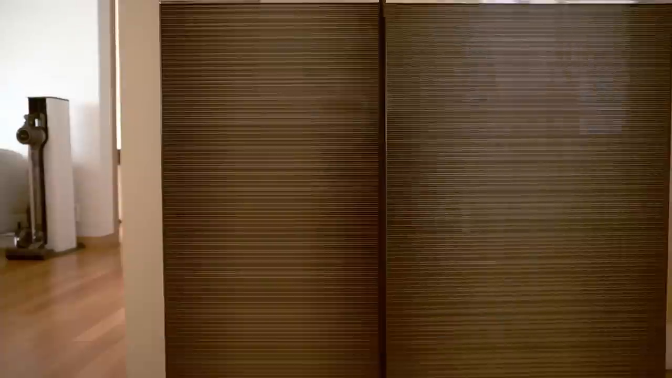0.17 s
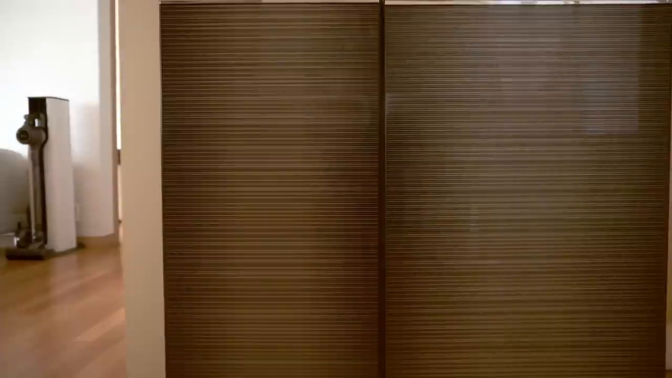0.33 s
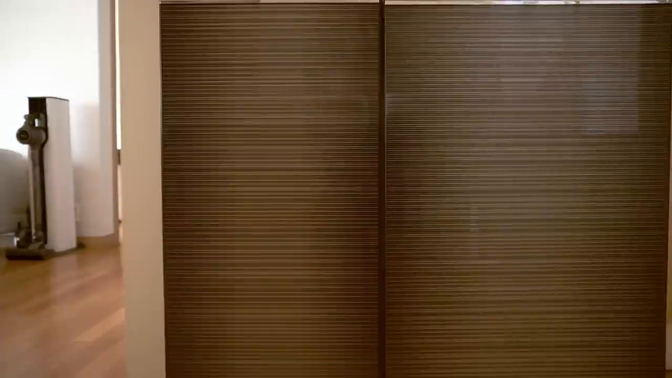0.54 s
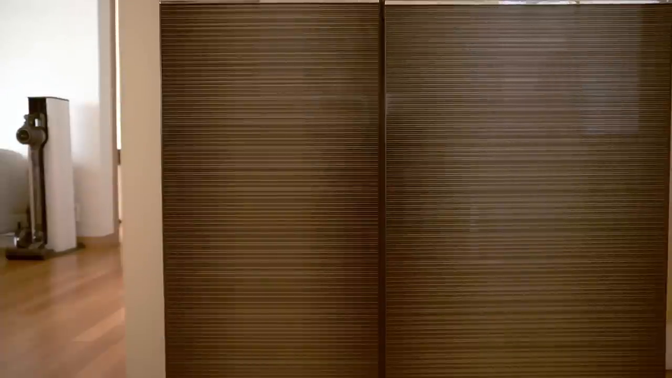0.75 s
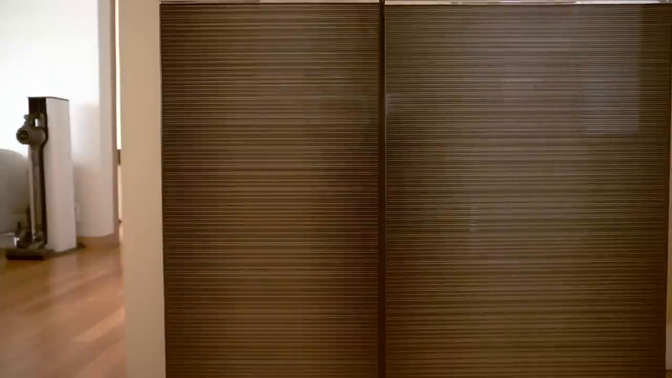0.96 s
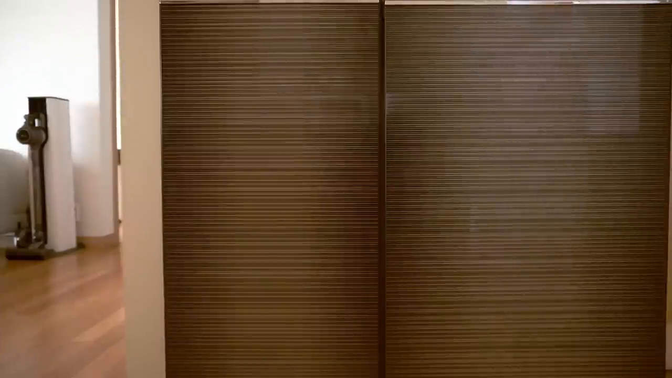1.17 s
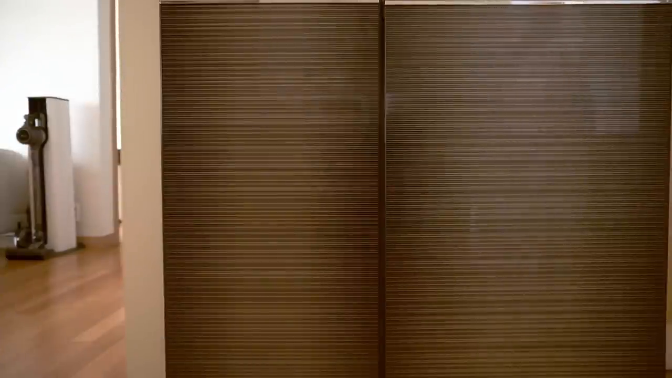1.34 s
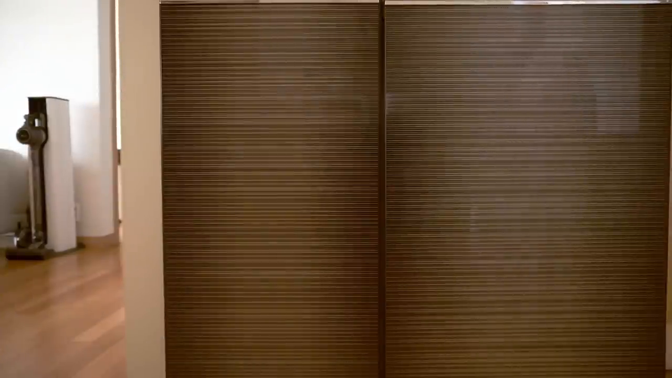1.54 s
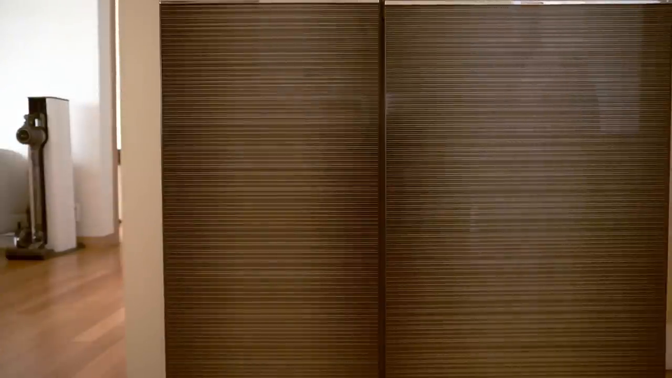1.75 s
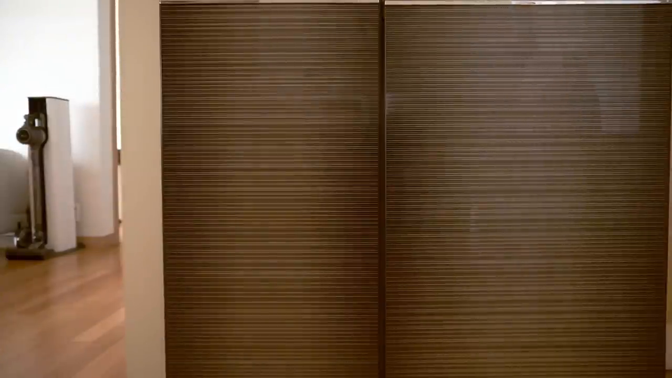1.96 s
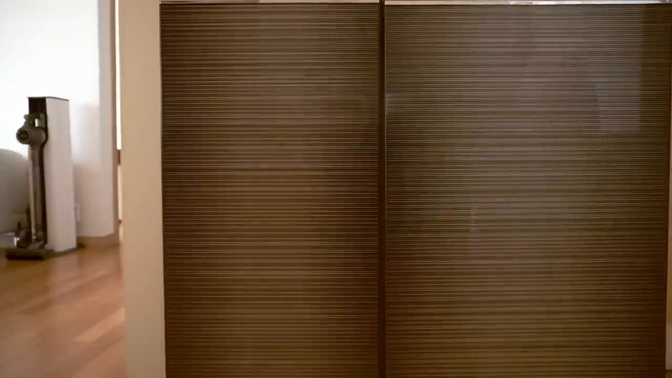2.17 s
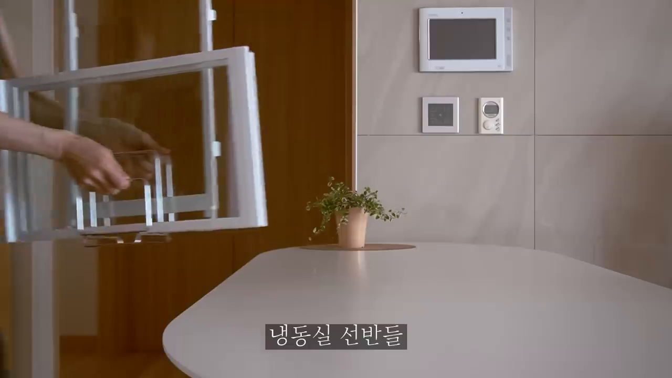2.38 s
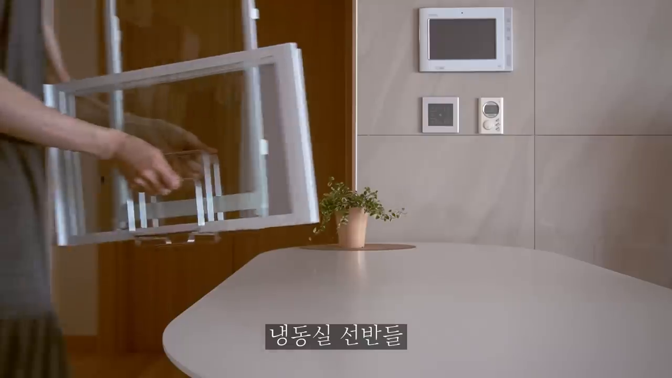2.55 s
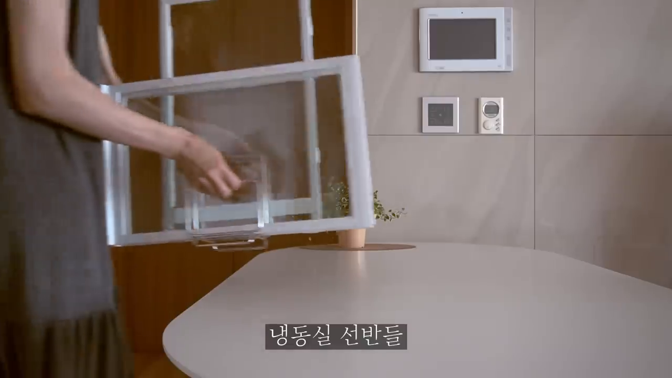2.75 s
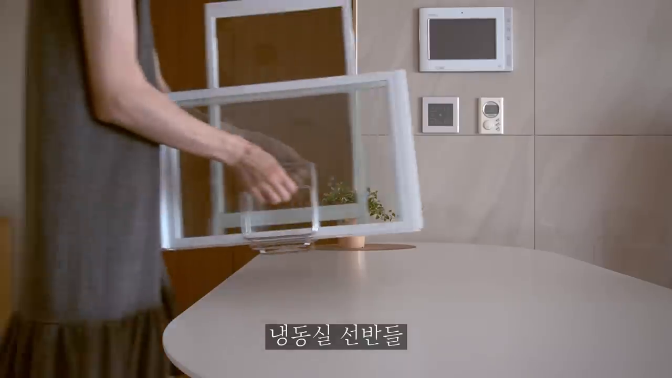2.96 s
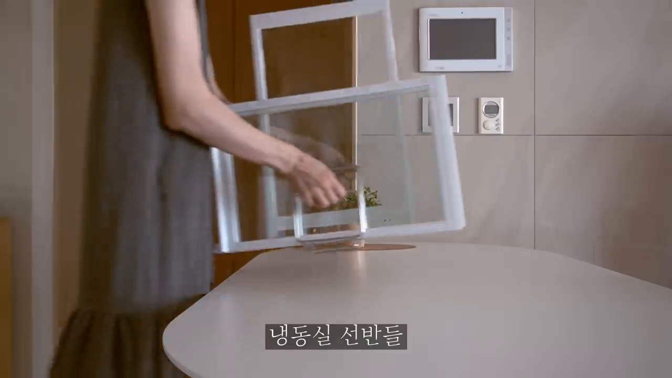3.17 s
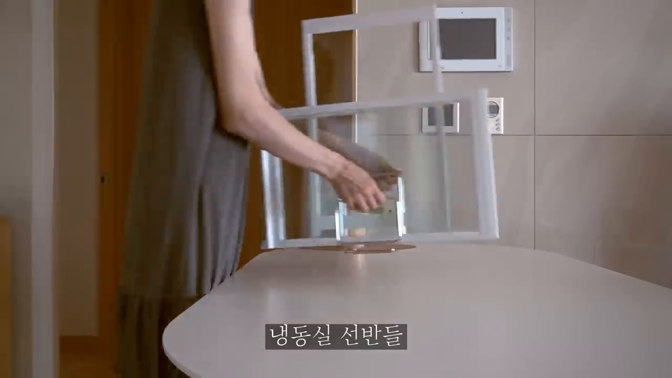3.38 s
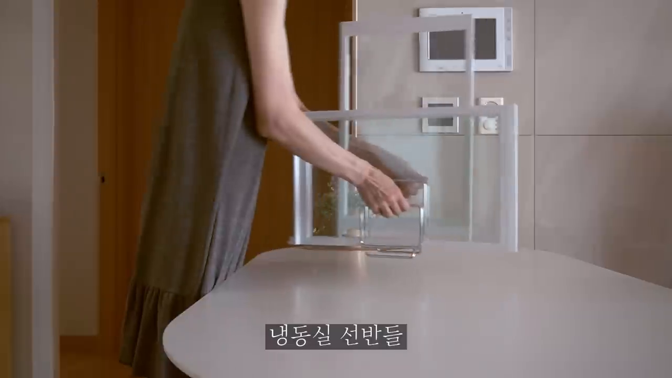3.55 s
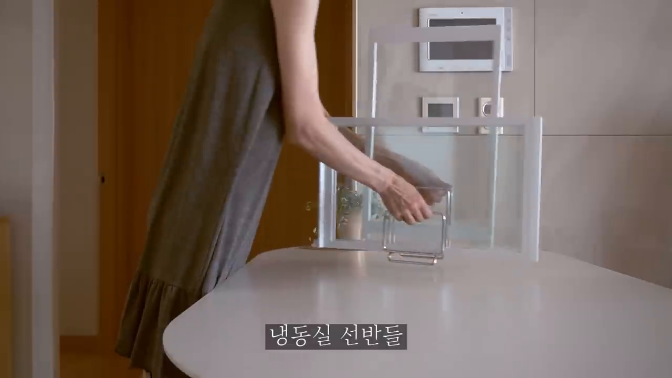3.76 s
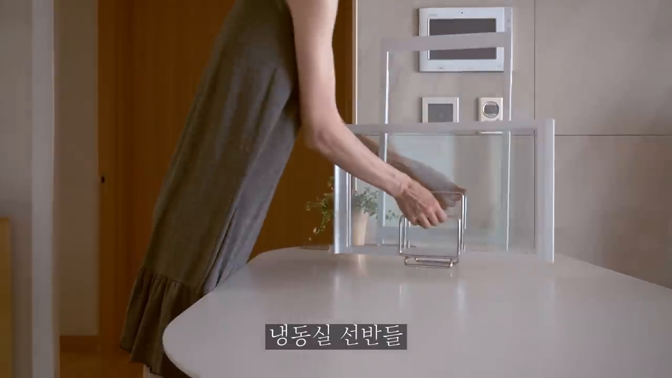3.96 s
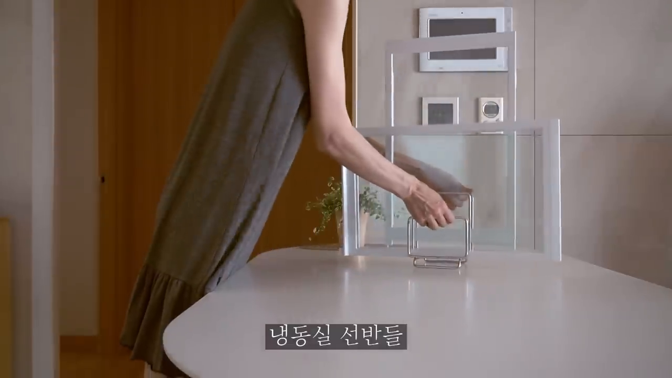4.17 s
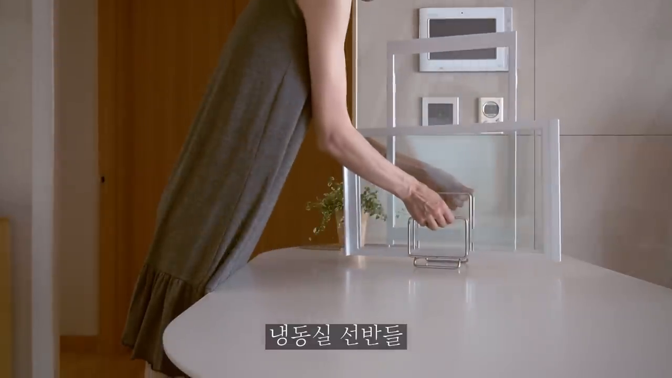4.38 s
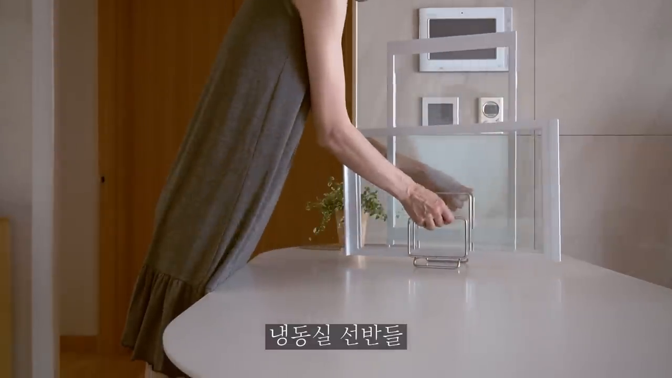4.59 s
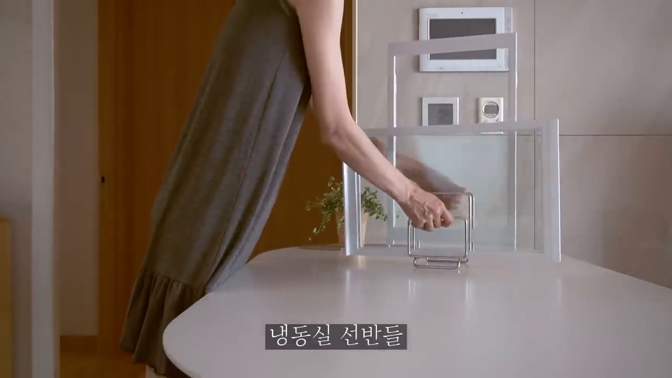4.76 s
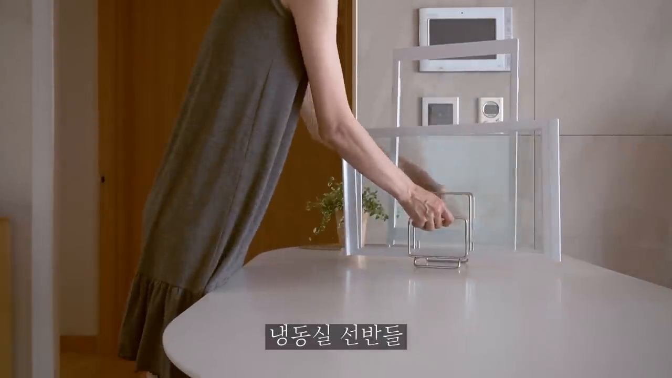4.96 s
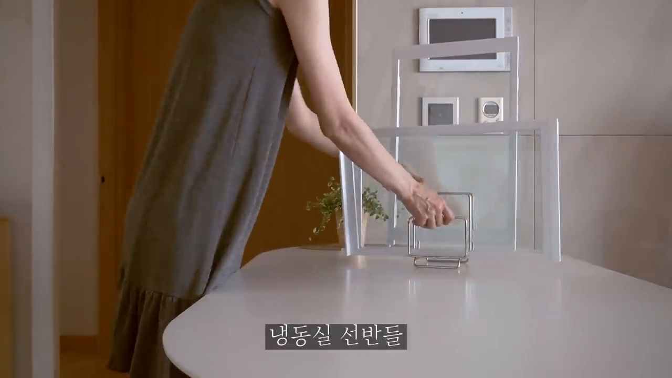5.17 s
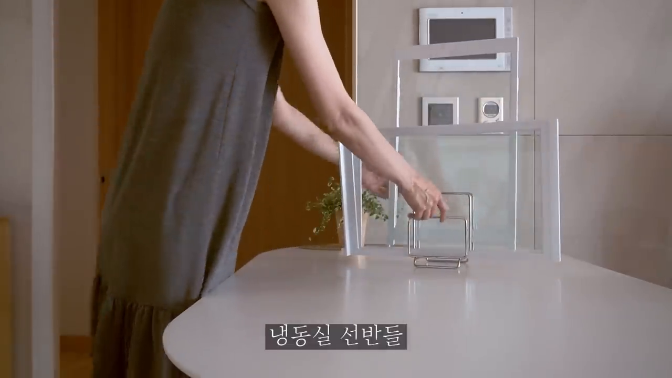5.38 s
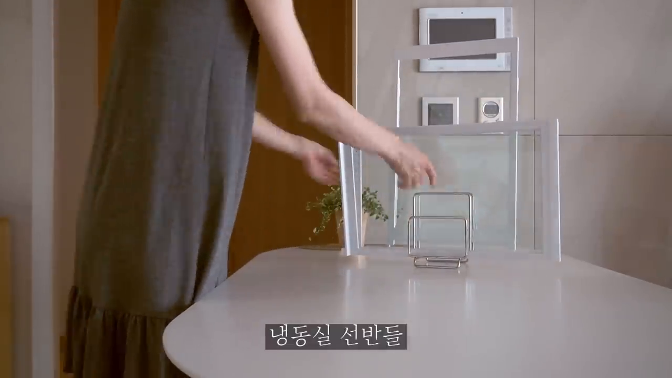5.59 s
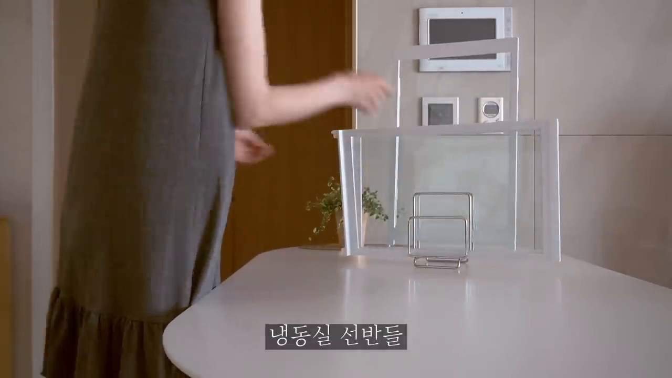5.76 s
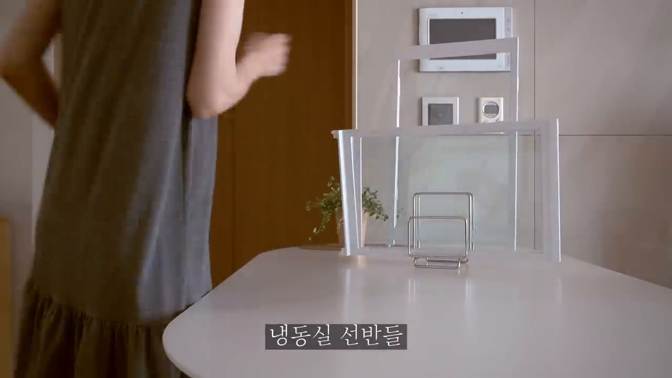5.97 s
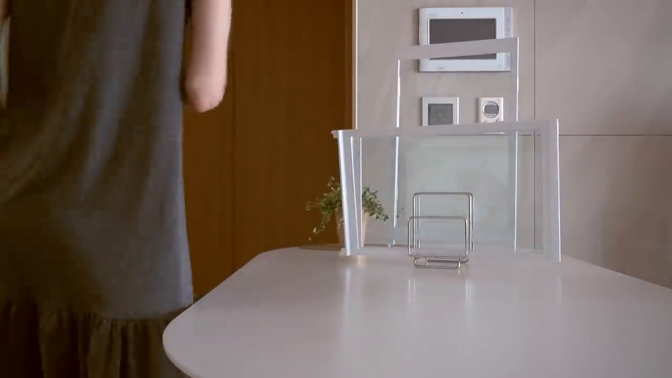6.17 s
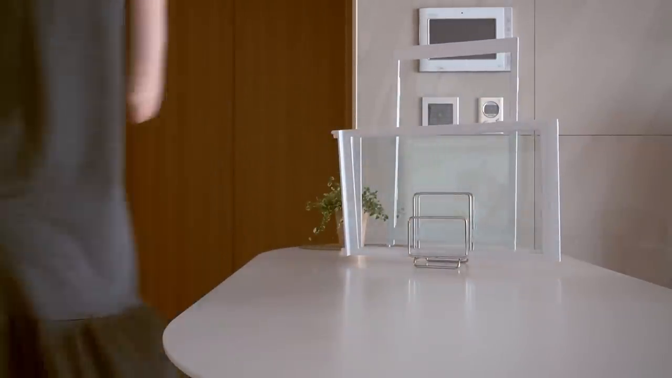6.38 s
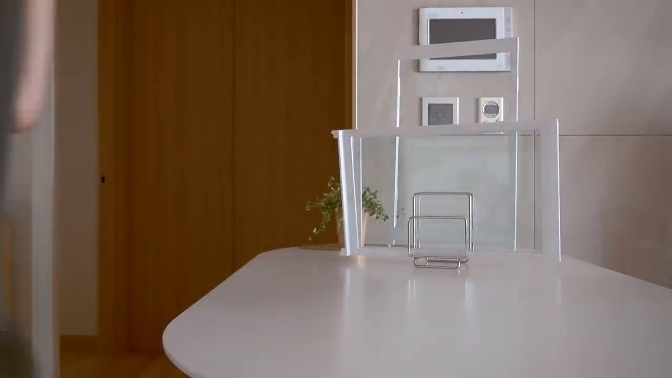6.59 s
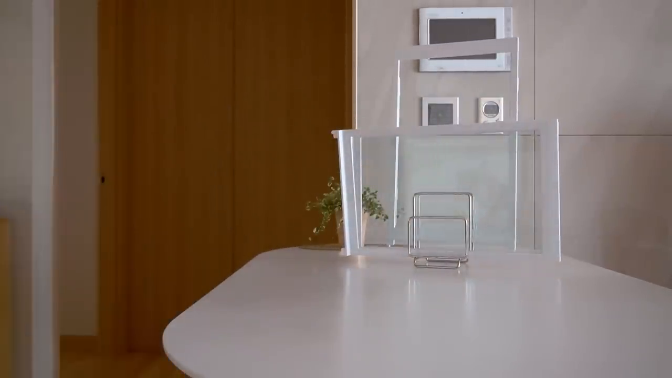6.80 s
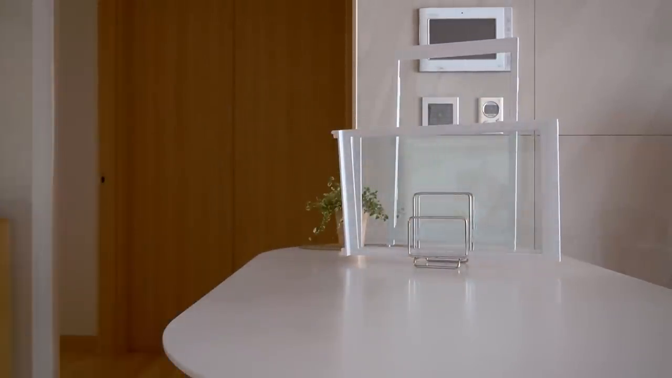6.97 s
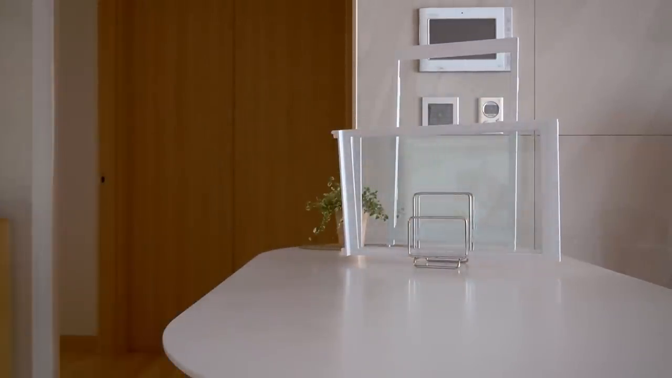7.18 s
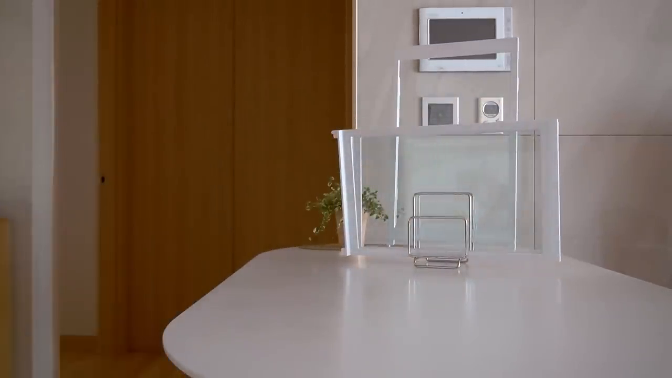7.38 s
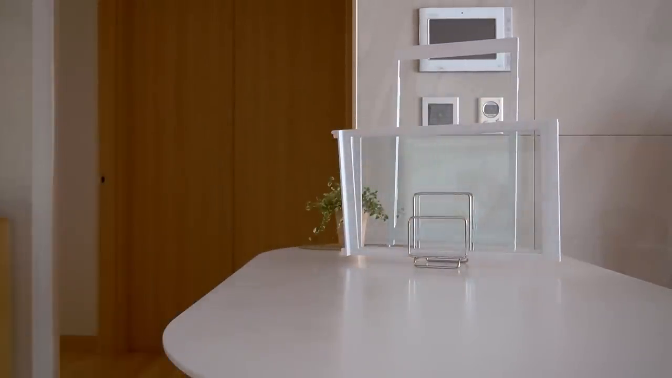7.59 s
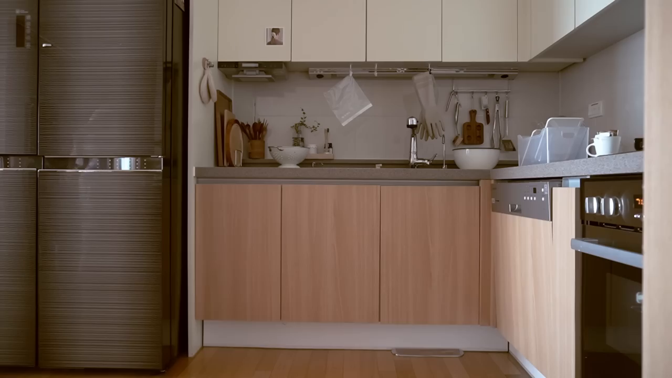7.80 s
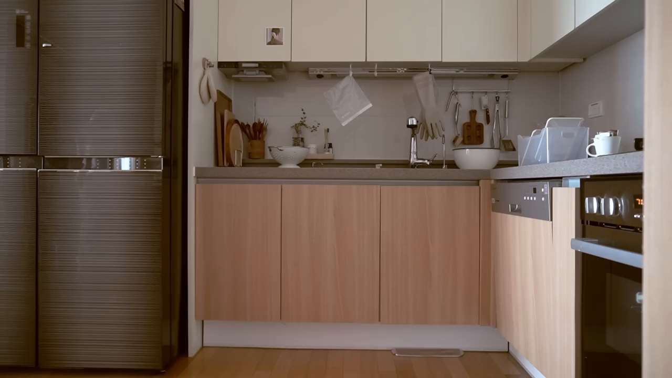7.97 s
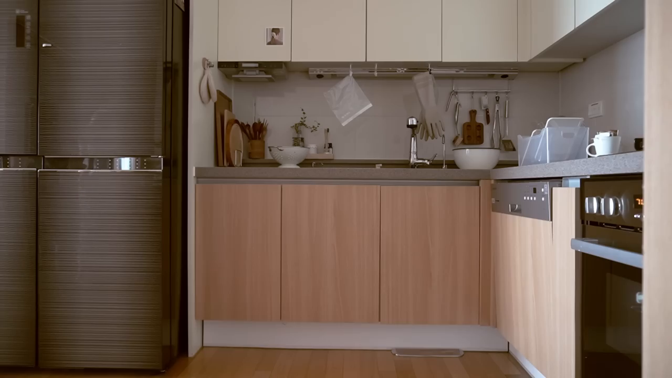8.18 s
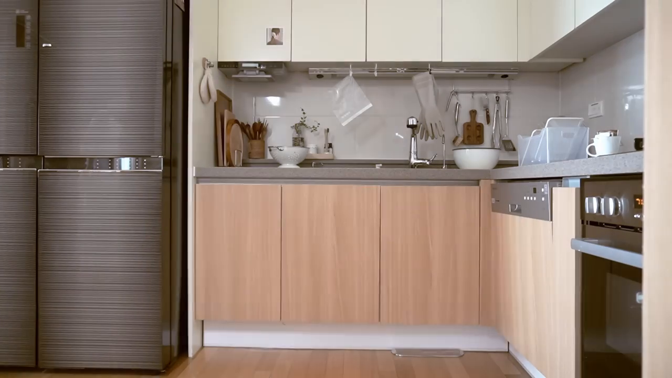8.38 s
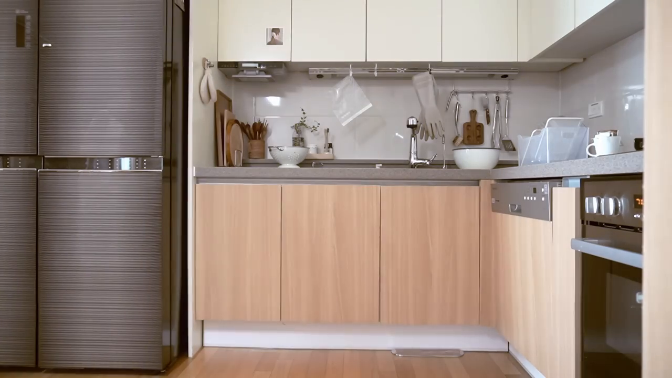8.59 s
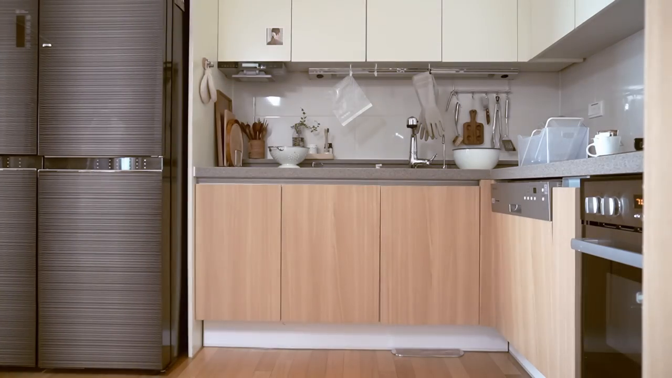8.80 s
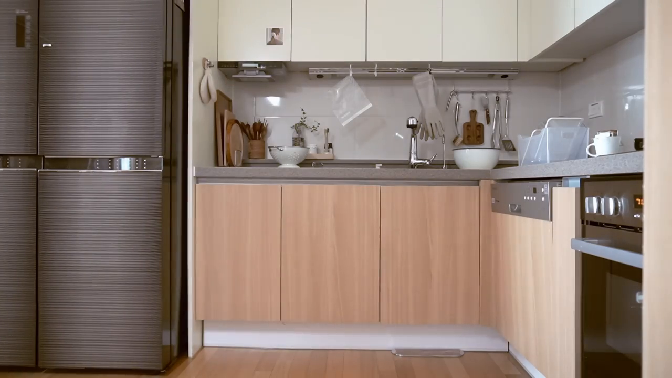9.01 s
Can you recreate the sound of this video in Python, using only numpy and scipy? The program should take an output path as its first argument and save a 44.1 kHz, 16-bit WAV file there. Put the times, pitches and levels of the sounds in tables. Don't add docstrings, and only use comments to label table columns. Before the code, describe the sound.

A refrigerator door slams with a heavy thump, then light plastic shelves rattle onto a table and clatter, and a kitchen latch clacks over faint hum.

```python
import sys
import numpy as np
from scipy import signal
from scipy.io import wavfile
from scipy.ndimage import uniform_filter1d

SR = 44100
rng = np.random.default_rng(int(sys.argv[2]) if len(sys.argv) > 2 else 0)


def how_loud(loudness_db):
    steps = np.asarray(loudness_db, float) / 20
    return 10 ** steps


def unload_wav(signal):
    wavfile.write(
        sys.argv[1],
        SR,
        np.round(np.clip(np.atleast_2d(signal).T, -1, 1) * 32767).astype(np.int16),
    )


N = 398663

PLACE_STARTS_S = [
    0,
    2.33,
    7.795,
    9.1,
]
# frequency in Hz, level in dB per Hz.
AIR_COLOURS = [
    [(12, -43), (20, -9.5), (65, -2.5), (86, -31), (113, -9), (172, -53), (222, -8), (285, -22), (337, -13),
     (446, -21.5), (542, -10), (642, -27), (897, -23.5), (4060, -40.5), (16000, -56.5)],
    [(12, -58), (20, -25.5), (49, -2.5), (70, -9), (91, -25.5), (172, -12), (198, -22), (234, -9.5),
     (293, -16.5), (347, -18), (513, -13), (574, -12), (698, -23), (3840, -41.5), (16000, -52.5)],
    [(12, -23), (20, 0), (49, -10.5), (86, -11.5), (116, -35), (158, -13.5), (367, -14), (410, -27),
     (472, -12.5), (590, -21.5), (642, -20), (1000, -21.5), (5500, -46.5), (16000, -55.5)],
]
AIR_LEVELS_DB = [
    -42.5,
    -46,
    -42,
]
# frequency in Hz, width in Hz, level in dB.
AIR_LINES = [
    [(565, 86, -51.5), (4000, 1000, -67)],
    [(579.3, 30.5, -53.5), (661, 11, -63.5), (4030, 25, -82), (3740, 730, -75.5)],
    [(58.9, 14, -52.5), (2800, 34, -77), (3970, 380, -73)],
]
# frequency in Hz, level in dB, slow swell in dB.
HUMS = [
    (57.4, -46, -2),
    (60.2, -47.5, 1.2),
    (58, -56.5, 6.5),
]
# multiple of the hum, level in dB.
HUM_ORDERS = [
    (1, -1.5),
    (2, -15.5),
    (3, -19),
]
# frequency in Hz, t60 in seconds.
ROOM_T60 = [(60, 0.45), (250, 0.54), (1000, 0.57), (4000, 0.56), (8000, 0.53), (11000, 0.41), (15000, 0.34)]

# start in seconds, level in dB, fade in dB per second.
THUDS = [
    (0.301, -30, 42),
    (0.961, -45, 150),
    (1.089, -54, 100),
    (7.109, -36.5, 90),
    (7.28, -37.5, 115.5),
]
# start in seconds, peak in dB, rise in seconds, centre in Hz, gritty share 0-1.
SCUFFS = [(2.963, -51.5, 0.04, 8500, 0.13), (3.195, -66, 0.0065, 4000, .1),
          (3.539, -59, 0.0055, 3210, 0.55), (3.586, -57.5, .006, 3340, 0.76), (5.66, -63, .01, 3800, 0.1),
          (6.48, -61, 0.029, 4600, 0.4), (6.54, -55.5, .035, 4000, 0.75), (7.19, -67, 0.024, 8000, 0.1)]
# start in seconds, level in dB.
CATCHES = [
    (7.95, -41.5),
    (8.065, -47.5),
    (8.261, -59),
]
# start in seconds, peak in dB, note in Hz, t60 in seconds.
SLIPS = [(7.972, -47, 996, 0.055), (7.985, -38.5, 1037, 0.051), (7.995, -43, 680, 0.057),
         (8.007, -39, 1270, 0.034), (8.02, -39, 1310, .03), (8.034, -37, 1340, 0.06),
         (8.042, -32.5, 1195, 0.044), (8.051, -36, 1030, .03), (8.066, -39, 1200, 0.046),
         (8.094, -42, 1306, 0.054)]

# start in seconds, peak in dB, chatter in ms.
LATCH = [(8.3231, -15.5, 6.7), (8.3269, -13, 4), (8.337, -10.5, 7.6), (8.343, -20, 3.4), (8.354, -14, 8.1),
         (8.368, -23, 4.8), (8.386, -24, 8)]
# frequency in Hz, level in dB per Hz.
LATCH_CRACK = [(120, -56), (200, -30), (223, -41), (387, -16), (440, -17), (538, -6.5), (1230, -12.5),
               (1680, -0.5), (2170, -12.5), (3900, -10), (4400, -17.5), (5100, -18), (6000, -15),
               (6900, -16.5), (7800, -14), (8900, -20), (9500, -22), (10400, -29), (11400, -31.5),
               (12400, -33), (13400, -29), (14200, -35), (14900, -32), (16000, -40)]
# frequency in Hz, level in dB, t60 in seconds.
LATCH_RINGS = [(1720, -26, .12), (1750, -17, 0.17), (1950, -2, 0.035), (3300, -27, .12), (4070, -10, .05),
               (6100, -13.5, 0.11), (7860, -8, 0.04), (9600, -13, 0.06)]

# start in seconds, peak in dB, low-end weight in dB, brightness in dB.
RATTLE = [(2.351, -42, 4, -34), (2.377, -34, 13, -12), (2.411, -39, 1, -33.5), (2.435, -36.5, -2, -31),
          (2.46, -37, -18, -26), (2.518, -44, -19, -1), (2.611, -35.5, -26, -30), (2.6152, -35, -22, -24),
          (2.705, -36, -19, -34), (2.7185, -30, -12, -30), (2.7232, -33, -6, -40), (2.758, -37, -6, -6),
          (2.7915, -30, -10, -34), (2.829, -40, -16, -24), (2.836, -43, -17, -15), (2.87, -41.5, -14, -22),
          (2.876, -42, -22, -10), (3.184, -44, 8, -17), (3.206, -40, -10, -7), (3.543, -39, 1, -24),
          (3.593, -48, -18, -21), (3.854, -43, 3, -36), (3.927, -39.5, -30, -27), (4.6205, -35, 2, -30),
          (4.648, -37, 2, -28), (4.707, -36, -6, -41), (4.73, -35, -10, -35), (4.754, -44, -11, -25),
          (5.454, -33, -5, -16)]
# start in seconds, peak in dB, low-end weight in dB, brightness in dB.
LEAVING = [(6.513, -52, -25, -6), (6.495, -50, -22, -12), (6.543, -50, -26, -14), (6.572, -42, -29, -8),
           (6.588, -54, -17, -16), (6.627, -52, -25, -12), (7.058, -37.5, -4, -21), (7.312, -51, -10, -24),
           (7.133, -41, -5, -26)]
# frequency in Hz, level in dB per Hz.
TICK_CRACK = [(410, -19.5), (700, -1), (1170, 0.5), (1480, -6.5), (1620, -2.5), (4000, -15.5),
              (4700, -23.5), (7870, -31), (14000, -43)]
# frequency in Hz, level in dB, t60 in seconds.
TICK_RINGS = [(1140, -11, .03), (1430, -23, 0.037), (2260, -19, 0.014)]

# start in seconds, peak in dB, weight in dB, brightness in dB, chatter in ms.
SET_DOWN = [
    (4.0157, -5.5, -38, -42, 1.3),
    (4.073, -33, -10, -20, 4.6),
    (4.1445, -16, -35, -39, 2.2),
    (4.1535, -17, -38, -44, 3.5),
    (4.165, -30, -29, -14, 2.4),
]
# start in seconds, peak in dB, weight in dB, brightness in dB, chatter in ms.
SETTLE = [
    (4.2365, -23, -19, -35, 1.2),
    (4.249, -8, -30, -38, 1.3),
    (4.254, -17, -25, -20, 4),
    (4.3245, -18, -30, -40, 2.0),
]
# frequency in Hz, level in dB per Hz.
SET_CRACK = [(53, -57), (90, -6), (165, -3.5), (510, -9.5), (769, 2), (956, -8), (1070, 4), (2300, -7),
             (2530, -15), (3010, -12), (3430, -22.5), (3830, -15.5), (5000, -31), (16000, -56.5)]
# frequency in Hz, level in dB, t60 in seconds.
SET_RINGS = [(178, -2, 0.12), (730, 1, 0.088), (1050, 6.5, 0.064), (1270, -10, 0.091), (1490, 0, 0.066),
             (2160, -5, 0.06), (2643, -9, 0.08), (2940, -17, 0.08), (3644, -13, 0.2), (4360, -24, 0.1),
             (5740, -28, 0.27)]
# frequency in Hz, level in dB, t60 in seconds.
SETTLE_RINGS = [(790, -6, 0.05), (1060, 5, 0.065), (1200, -12, 0.064), (1340, 3, 0.05), (1950, -13, 0.044),
                (2400, -12, 0.08), (2910, -9, 0.07), (3774, -10.5, 0.22), (3896, -10, 0.24),
                (4040, -20, 0.08), (5630, -28, 0.25)]
# start in seconds, peak in dB, weight in dB, brightness in dB, chatter in ms.
CLATTER = [(4.9435, -11.5, -11, -1, 3.8), (4.9485, -11, -26, -3.5, 2.3), (4.957, -16, -15, -12, 3.4),
           (4.9645, -8.5, -9, -10, 4.4), (4.973, -14, -14, -12, 4), (4.9857, -7, -14, -18, 1.8),
           (4.991, -10, -22, -15, 2.7), (5.0035, -10.5, -11, -11, 1.9), (5.008, -8, -22, -4, 3),
           (5.019, -13, -25, -18, 2.7), (5.034, -21.5, -34, -5, 3), (5.049, -16, -21, -2, 6),
           (5.064, -21, -21, -9, 5), (5.184, -9.5, -24, 1, 2.0), (5.192, -11, -19, -19, 2),
           (5.198, -14, -19, -9, 3.3), (5.2456, -14.5, -13, -19, 2.5), (5.2505, -15, -30, -5, 2.4),
           (5.265, -19.5, -16.5, -8, 5), (5.281, -23, -20, -12, 4), (5.301, -25, -15, -16, 5)]
# frequency in Hz, level in dB per Hz.
CLATTER_CRACK = [(53, -36), (90, -22), (112, 1.5), (180, -2.5), (330, -28), (521, 7.5), (593, 1), (753, 5),
                 (956, -2), (1440, 0.5), (2760, -4.5), (3830, -1.5), (4750, -12), (6400, -16), (9110, -20),
                 (13000, -34), (16000, -42)]
# frequency in Hz, level in dB, t60 in seconds.
CLATTER_RINGS = [(172, -27, 0.11), (526, -1.5, 0.063), (713, -7, 0.032), (1420, -30.5, .06),
                 (1670, -8, 0.13), (2050, -12, 0.079), (2510, -37, 0.058), (3120, -20.5, .08),
                 (3400, -39, 0.086), (3930, -5.5, 0.032), (6540, -22, 0.091), (8040, -31, .1)]
# start in seconds, peak in dB, note in Hz, t60 in seconds.
CLACKS = [(4.0162, -11, 2152, 0.037), (4.2525, -18, 147, 0.041), (4.2495, -15, 1143, 0.016),
          (4.2495, -18, 1950, 0.023), (4.945, -18.5, 555, 0.036), (4.945, -17.5, 1600, 0.043),
          (4.986, -14.5, 2400, 0.011), (4.986, -20.5, 640, 0.034), (5.005, -17.5, 1950, .03),
          (5.008, -16.5, 3730, .03), (5.017, -20, 1700, 0.035), (5.1843, -9.5, 3760, 0.014),
          (5.1843, -11, 1394, 0.036), (5.1925, -17, 896, 0.045), (5.188, -30, 125, .2),
          (5.187, -20, 510, .1), (5.26, -37, 185, .4), (4.0175, -24, 165, .09), (4.0165, -16, 1050, .04),
          (5.1835, -27, 10200, .008), (5.185, -28, 6500, .03), (5.0038, -31, 12800, .012),
          (.048, -34, 2620, .02), (4.1455, -38, 3680, .07), (4.325, -26, 1600, .03),
          (4.325, -28, 2050, .03), (.2785, -20, 2200, .015), (.2775, -26, 3800, .015),
          (7.953, -44, 1900, .04), (7.96, -46, 2500, .02), (7.954, -55, 9500, .008),
          (8.06, -58, 7600, .012), (7.955, -50, 4050, .06), (7.955, -56, 8000, .015),
          (6.573, -49, 3200, .02), (6.587, -51, 3400, .02), (6.035, -57, 2600, .08), (4.708, -43, 640, .05),
          (4.73, -46, 1900, .03), (2.376, -43, 1100, .04), (2.4605, -48, 3500, .02),
          (5.2465, -21, 630, 0.044), (5.2505, -21.5, 3520, 0.012)]

# start in seconds, peak in dB, chatter in ms.
GASKET = [
    (0.047, -22, 3.8),
    (0.059, -43, 5.7),
    (0.083, -50, 7.3),
]
# frequency in Hz, level in dB per Hz.
GASKET_CRACK = [(88, -55), (150, -11), (260, -4.5), (349, 3), (739, -11), (810, -16.5), (1030, -16),
                (2530, -18), (12000, -50.5), (15600, -86), (22000, -120)]
# frequency in Hz, level in dB, t60 in seconds.
GASKET_RINGS = [(330, -8, .14), (555, -12, .12), (2700, 5, .025), (2500, -2, .05)]
# start in seconds, peak in dB, weight in dB, brightness above 4 kHz in dB, chatter in ms.
DOOR = [
    (.2708, -30, -2, -14, 2),
    (.2746, -3, -4, 3, 4),
    (.2785, -4, -7, 2, 8),
    (.296, -11, -12, -10, 11),
    (.306, -14, 2, -19, 8.9),
    (.335, -19.5, -9, -13, 5),
    (.4155, -31, -5, 18, 2),
]
# start in seconds, peak in dB, weight in dB, brightness in dB, chatter in ms.
CABINET = [
    (1.292, -34, -26, 0.25, 8.2),
    (1.88, -40, -18, 0.26, 6.1),
    (2.176, -57, 15, 0.3, 4.6),
]
# frequency in Hz, level in dB per Hz.
DOOR_CRACK = [(59, -24), (100, 5), (153, -12), (308, -2), (736, -6.5), (854, -4.5), (1030, -8.5),
              (1130, -10.5), (2080, -10.5), (2270, -11.5), (3250, -20), (4110, -19), (5650, -34.5),
              (9020, -34), (16000, -53)]
# frequency in Hz, level in dB, t60 in seconds.
DOOR_RINGS = [(342, 1.5, 0.11), (550, -8, 0.058), (770, -28, 0.028)]

THUD_RISE_S = 0.023
SCUFF_HOLD_S, SCUFF_FADE_DB_PER_S, SCUFF_SAG_PER_S = 0.011, 155, 3.7
SLIDE_S, SLIDE_DB, SLIDE_RISE_S, SLIDE_HOLD_S, SLIDE_FADE_DB_PER_S = 7.955, -30.5, 0.048, 0.035, 300
SLIDE_HZ, SLIDE_UP_HZ = 870, 330
LATCH_DULLS_DB_PER_S, LATCH_EVEN_S, LATCH_BRIGHTEST_DB = 448, 7.6, 9
TICK_CHATTER_MS = 2.26
SHUT_S, PILE_DB, PILE_MS, SUCK_DB, SUCK_MS = .2749, -13, 2.2, -6, 5.24
BREATHE_HZ, BREATHE_DB, BREATHE_T60_S = 16, -17.5, 0.9


def evened(x):
    return x / np.sqrt(np.mean(x ** 2) + 1e-20)


def read(points, hz):
    f, value = np.transpose(points)
    return np.interp(np.log(hz + 1), np.log(f + 1), value)


def add(mix, s, sound):
    part = mix[round(s * SR):][:len(sound)]
    part += sound[:len(part)]


def slow(seconds):
    size = round(seconds * SR)
    once = uniform_filter1d(rng.standard_normal(N), size=size)
    return evened(uniform_filter1d(once, size=size))


def stroke(rise_s, hold_s, fade_db_per_s, length_s=1.0):
    t = np.arange(0, length_s, 1 / SR)
    rise = np.sin(np.pi / 2 * np.minimum(t / rise_s, 1)) ** 2
    return t, rise * how_loud(-fade_db_per_s * np.maximum(t - rise_s - hold_s, 0))


def resonate(x, hz, width_hz):
    turn = np.exp(2j * np.pi * np.cumsum(hz * np.ones(len(x))) / SR)
    r = np.exp(-np.pi * width_hz / SR)
    return 2 * (turn * signal.lfilter([1 - r], [1, -r], x / turn)).real


def resonate_twice(x, hz, width_hz):
    return resonate(resonate(x, hz, width_hz), hz, width_hz)


def causal(gain_db):
    log = np.maximum(gain_db, -100) * np.log(10) / 20
    circle = np.r_[log, log[-2:0:-1]]
    return np.fft.ifft(np.exp(circle - 1j * signal.hilbert(circle).imag)).real[:len(log)]


def air(colour, db, lines, patchy_db=0.6):
    frames, hz = N // 512 + 5, np.fft.rfftfreq(2048, 1 / SR)
    a, b, patches = rng.standard_normal((frames, 1025, 3)).T
    patches = uniform_filter1d(patches, size=20, axis=0)
    patches = evened(uniform_filter1d(patches, size=10, axis=1))
    gain = how_loud(read(colour, hz)[:, None] + patchy_db * patches)
    wash = signal.istft((a + 1j * b) * gain, nperseg=2048, noverlap=1536)[1][:N]
    drone = np.zeros(N)
    for line_hz, width_hz, line_db in lines:
        drone += how_loud(line_db) * evened(resonate_twice(rng.standard_normal(N), line_hz, width_hz))
    return how_loud(db) * evened(wash) + drone


def hum(hz, db, swell_db, wobble_hz=0.605):
    turns = np.cumsum(hz + wobble_hz * slow(0.091)) / SR
    tones = sum(how_loud(d) * np.sin(2 * np.pi * k * turns) for k, d in HUM_ORDERS)
    return np.sqrt(2) * how_loud(db + swell_db * slow(0.05)) * tones


def background():
    place = np.digitize(np.arange(N) / SR, PLACE_STARTS_S) - 1
    out = np.zeros(N)
    for k in range(len(AIR_COLOURS)):
        here = uniform_filter1d(1. * (place == k), size=200)
        out += here * (air(AIR_COLOURS[k], AIR_LEVELS_DB[k] - 2.5, AIR_LINES[k]) + hum(*HUMS[k]))
    return out


def room(x, gap_ms=1.9):
    taps, at = np.zeros(SR), np.arange(0, SR - 20, 20)
    taps[at + rng.integers(0, 20, len(at))] = rng.choice([-1., 1.], len(at))
    taps *= np.clip(np.arange(SR) / SR * 1000 / gap_ms - 1, 0, 1)
    hz, t, z = signal.stft(taps, SR, nperseg=512)
    tail = signal.istft(z * how_loud(-60 * t / read(ROOM_T60, hz)[:, None]), SR, nperseg=512)[1]
    return signal.fftconvolve(x, tail / np.linalg.norm(tail))[:N]


def rumble():
    out = np.zeros(N)
    for s, db, fade_db_per_s in THUDS:
        t, shape = stroke(THUD_RISE_S, 0, fade_db_per_s)
        shake = resonate(resonate(rng.standard_normal(len(t)), 23, 110), 25, 140)
        add(out, s, how_loud(db) * evened(shake) * shape)
    return out


def rubbing(hz, width_hz, grain_db):
    grain = evened(uniform_filter1d(rng.standard_normal(len(hz)), size=60))
    slips = rng.standard_normal(len(hz)) * how_loud(grain_db * grain)
    return evened(resonate_twice(slips, hz, width_hz))


def scuffs():
    out = np.zeros(N)
    for s, db, rise_s, top_hz, grit in SCUFFS:
        t, shape = stroke(rise_s, SCUFF_HOLD_S, SCUFF_FADE_DB_PER_S, 0.65)
        hz = top_hz * np.exp(-SCUFF_SAG_PER_S * t)
        gritty = np.clip(grit, 0, 1)
        rub = (1 - gritty) * rubbing(1.07 * hz, 8000, grain_db=3.0) + gritty * rubbing(hz, 1700, grain_db=7.0)
        add(out, s, how_loud(db - 0.5) * shape * rub)
    return out


def slide():
    out = np.zeros(N)
    t, shape = stroke(SLIDE_RISE_S, SLIDE_HOLD_S, SLIDE_FADE_DB_PER_S, .4)
    hz = SLIDE_HZ + SLIDE_UP_HZ * np.minimum(t / (SLIDE_RISE_S + SLIDE_HOLD_S), 1)
    add(out, SLIDE_S, how_loud(SLIDE_DB - 12.5) * shape * rubbing(hz, 470, grain_db=1.5))
    for s, db in CATCHES:
        t, shape = stroke(0.0044, SCUFF_HOLD_S, SCUFF_FADE_DB_PER_S, 0.3)
        add(out, s, how_loud(db - 15.5) * shape * rubbing(3900 + 0 * t, 1300, grain_db=4.0))
    return out


def knocks(rows, rise_cycles):
    out, t = np.zeros(N), np.arange(SR // 4) / SR
    for s, db, hz, t60_s in rows:
        note = (1 - np.exp(-t * hz / rise_cycles)) * how_loud(-60 * t / t60_s) * np.sin(2 * np.pi * hz * t)
        add(out, s, how_loud(db) * note / abs(note).max())
    return out


def cluster(hz, db, t60_s, luck, t, spread=0.0127):
    modes = [how_loud(db + 1.1 * x - 60 * t / t60_s) * np.sin(2 * np.pi * hz * (1 + spread * y) * t) for x, y in luck]
    return sum(modes) / np.sqrt(3)


def strikes(rows, crack, rings, ring_db, soft_hz, weight_hz=500, rise_ms=0.18):
    out, hz, t = np.zeros((2, N)), np.fft.rfftfreq(4096, 1 / SR), np.arange(SR // 4) / SR
    rows, body = np.array(rows), causal(read(crack, hz))
    usual = np.median(rows, axis=0) * [0, 0, 1, 1, 0]
    soft = causal(-10 * np.log10(1 + (hz / soft_hz) ** 4))
    thin_db = -10 * np.log10(1 + (crack[1][0] / (hz + 1)) ** 6)
    t_ms = t[:2048] * 1000
    for s, db, weight_db, bright_db, chatter_ms in rows - usual:
        luck, grit = rng.standard_normal((len(rings), 3, 2)), rng.standard_normal(2048)
        chatter = grit * np.exp(-t_ms / max(chatter_ms, .1)) * (1 - np.exp(-t_ms / rise_ms))
        weight = 0.78 * weight_db / (1 + (hz / weight_hz) ** 2)
        bright = bright_db / (1 + (4000 / (hz + 1)) ** 2)
        tilt = causal(thin_db + weight + bright)
        ring = sum(cluster(*mode, three, t) for mode, three in zip(rings, luck))
        ring *= how_loud(ring_db) * abs(body).max()
        ring *= 1 - np.exp(-(t * 1000 / 0.38) ** 2)
        direct, plain = ring.copy(), ring.copy()
        add(direct, 0, signal.fftconvolve(signal.fftconvolve(body, soft), chatter / np.linalg.norm(chatter)))
        add(plain, 0, body)
        direct, plain = signal.fftconvolve(direct, tilt), signal.fftconvolve(plain, tilt)
        peak = abs(direct).max()
        add(out[0], s, how_loud(db) * direct / peak)
        add(out[1], s, how_loud(db) * plain / peak)
    return out


def latch_clack():
    contacts = []
    for s, db, chatter_ms in LATCH:
        bright_db = min(LATCH_DULLS_DB_PER_S * (LATCH_EVEN_S - s), LATCH_BRIGHTEST_DB)
        contacts.append((s, db, 0, bright_db, chatter_ms))
    return strikes(contacts, LATCH_CRACK, LATCH_RINGS, ring_db=-29.0, soft_hz=9400)


def light_ticks():
    rows = [(*row, TICK_CHATTER_MS) for row in RATTLE + LEAVING]
    return strikes(rows, TICK_CRACK, TICK_RINGS, ring_db=-32, soft_hz=9000, weight_hz=1800)


def rack_set_down():
    landing = strikes(SET_DOWN, SET_CRACK, SET_RINGS, ring_db=-27.0, soft_hz=6840)
    return landing + strikes(SETTLE, SET_CRACK, SETTLE_RINGS, ring_db=-28.0, soft_hz=7000)


def shelf_clatter():
    return strikes(CLATTER, CLATTER_CRACK, CLATTER_RINGS, ring_db=-25.5, soft_hz=8200)


def gasket_touch():
    rows = [(s, db, 0, 0, chatter_ms) for s, db, chatter_ms in GASKET]
    return strikes(rows, GASKET_CRACK, GASKET_RINGS, ring_db=-25, soft_hz=6000)


def door_push():
    t = np.arange(N) / SR - SHUT_S
    u = t * 1000 / SUCK_MS
    pile = how_loud(PILE_DB) * np.exp(np.minimum(t, 0) * 1000 / PILE_MS) * (t < 0)
    suck = how_loud(SUCK_DB) * np.sin(np.pi * np.clip(u, 0, 1)) ** .5
    later = np.maximum(t - SUCK_MS / 1000, 0)
    fade = how_loud(BREATHE_DB - 60 * later / BREATHE_T60_S)
    sway = fade * np.cos(2 * np.pi * BREATHE_HZ * later - 1.1) * (u > 1)
    return uniform_filter1d(pile - suck + sway, size=24)


def door_slam():
    return strikes(DOOR + CABINET, DOOR_CRACK, DOOR_RINGS, ring_db=-28.5, soft_hz=12000)


def scene():
    rubs = scuffs() + slide()
    slips, clacks = knocks(SLIPS, rise_cycles=4.0), knocks(CLACKS, rise_cycles=0.47)
    latch, ticks = latch_clack(), light_ticks()
    set_down, clatter = rack_set_down(), shelf_clatter()
    gasket, door = gasket_touch(), door_slam()
    wet = room(how_loud(-5.0) * door[1] + how_loud(4.0) * gasket[1] + how_loud(-2.5) * latch[1])
    wet += room(how_loud(-3.0) * ticks[1] + how_loud(-3.5) * set_down[1] + how_loud(-2.0) * rubs)
    wet += room(how_loud(-2.0) * clatter[1] + how_loud(-6.5) * clacks + how_loud(-5.2) * slips)
    direct = (gasket + door + ticks + set_down + clatter + latch)[0]
    direct += clacks + slips + rubs
    return (direct + wet + door_push() + rumble() + background())[None]


def top_cut(x):
    return signal.sosfilt(signal.butter(12, 16520, fs=SR, output="sos"), x)


def record(dry):
    lowpass = signal.firwin(511, 15780, window=("kaiser", 9), fs=SR)
    limited = signal.oaconvolve(np.clip(dry, -1, 1), lowpass[None], "same")
    return top_cut(limited)


dry = scene()
out = record(dry)
unload_wav(out)
```